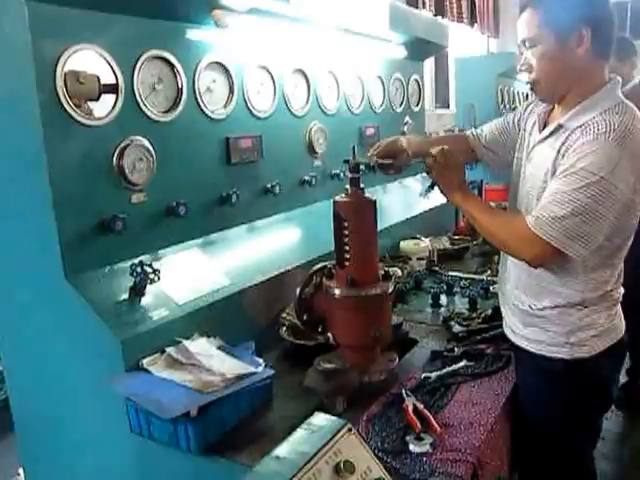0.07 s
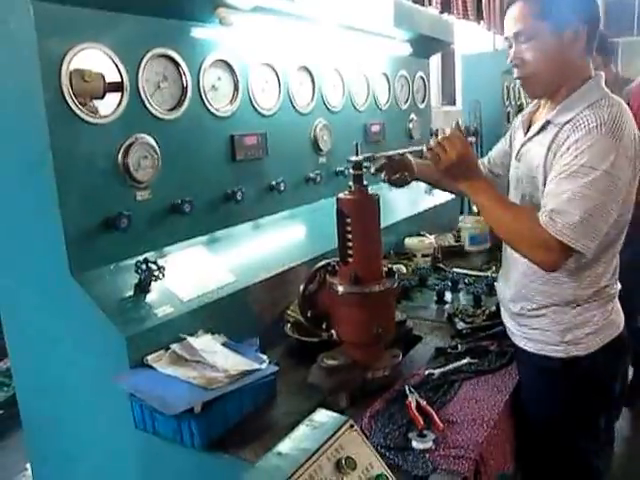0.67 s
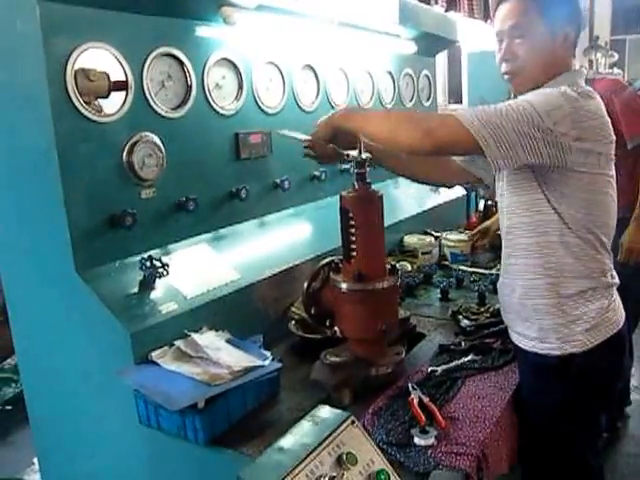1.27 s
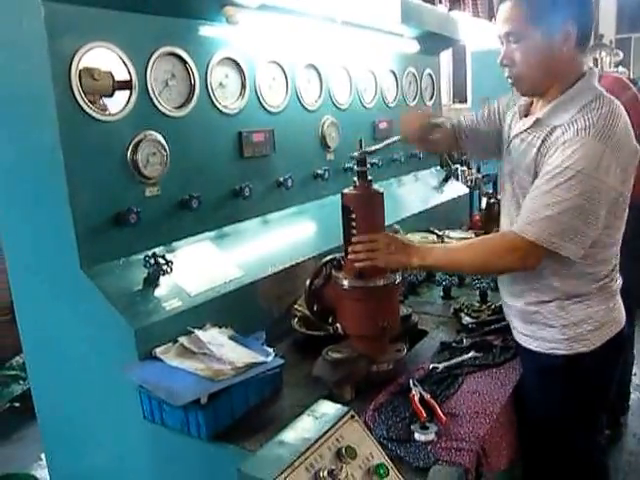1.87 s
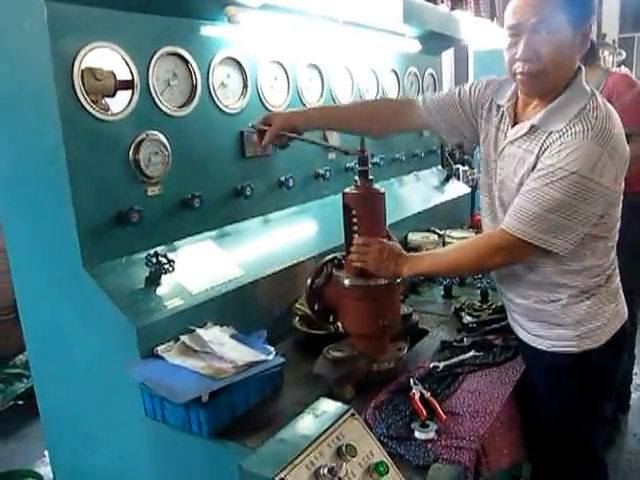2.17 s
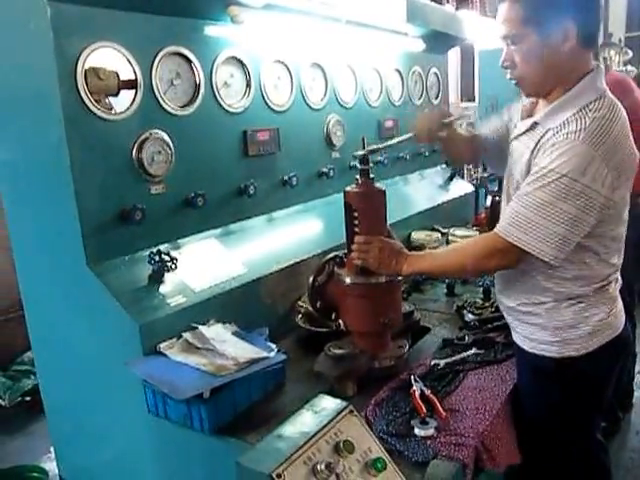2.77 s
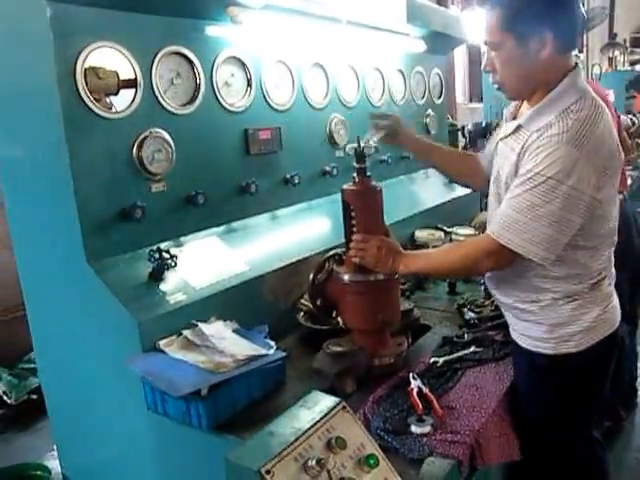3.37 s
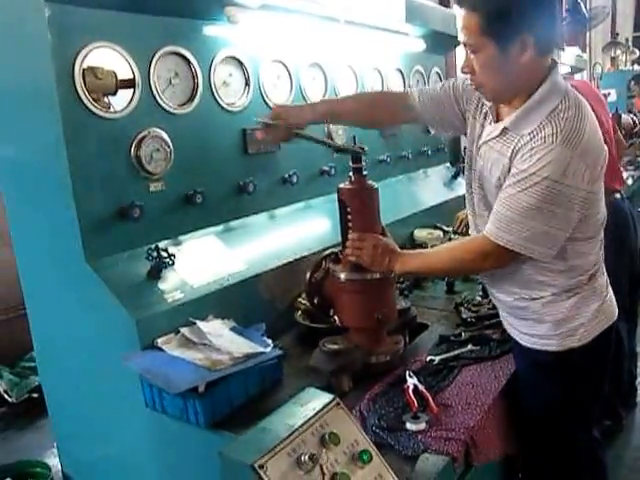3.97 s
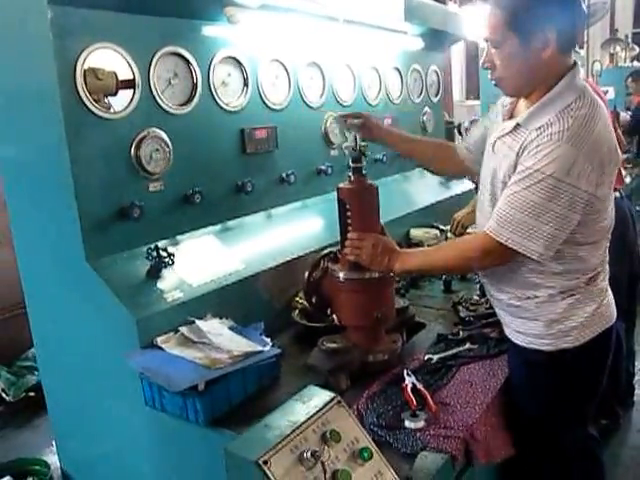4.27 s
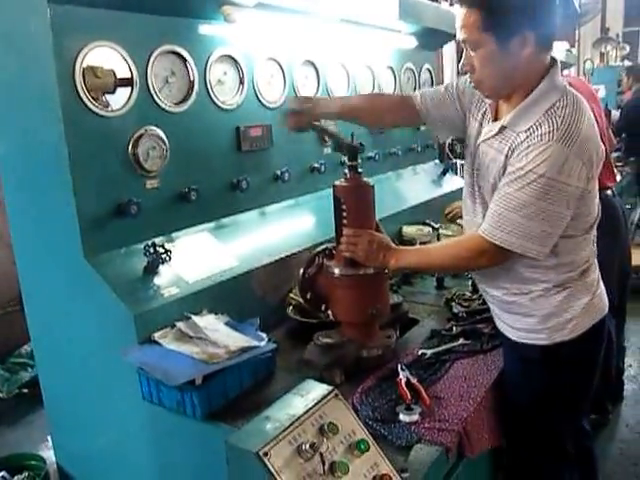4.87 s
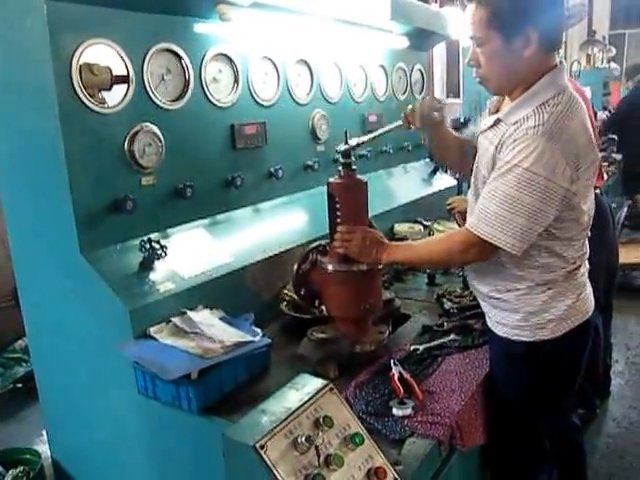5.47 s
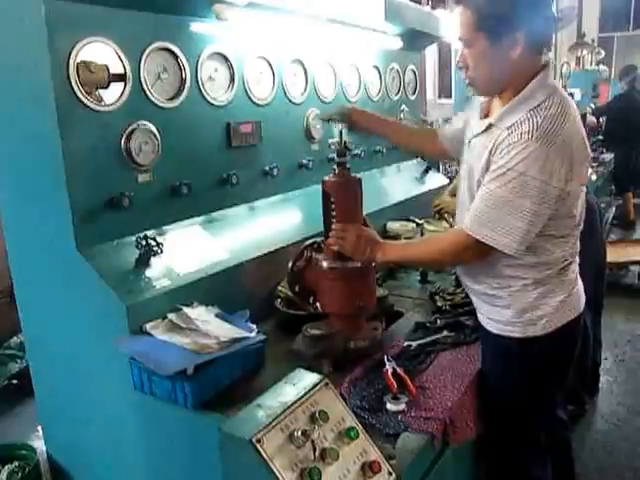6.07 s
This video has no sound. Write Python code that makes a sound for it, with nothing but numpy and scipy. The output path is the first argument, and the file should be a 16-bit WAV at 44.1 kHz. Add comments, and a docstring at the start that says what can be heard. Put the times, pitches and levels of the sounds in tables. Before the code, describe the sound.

Loud machinery rumbles throughout in a workshop, with motor hums and whines that swell and fade and air hissing in uneven surges. A thin, higher jet of air eases off at around 2 seconds. At the very start a steel wrench rings briefly as it rubs, and irregular metal knocks and short scrapes follow, busiest in the first second. At about 1.5 seconds a heavy part lands on the bench with a dull thump. A second machine then takes up load, building from 2 seconds into a broad, resonant drone that lasts to the end. Faint rough squeals come and go between 3.2 and 5.4 seconds. A soft puff of air vents at 4 seconds. Near 4.5 seconds steel scrapes and rings, the ring dying away slowly. Scattered knocks continue under the din until the end at about 6 seconds.

```python
"""Machine shop, valve test bench

Motors rumble and hum; air hisses in uneven surges. A heavy part lands with a dull thump.
A second machine then takes up load: friction drives its frame into a broad, resonant drone.
Steel parts clatter and scrape under the din; now and then rubbed metal rings."""
import sys
import numpy as np
from scipy import signal
from scipy.fft import rfft, irfft
from scipy.io import wavfile
from scipy.ndimage import uniform_filter1d

SR = 44100
rng = np.random.default_rng(int(sys.argv[2]) if len(sys.argv) > 2 else 0)


def transcribe(u):
    """Save the signal u as a 16-bit wav file named by the first command-line argument.

    u: samples, shape (n,) or (channels, n), limited to [-1, 1]; the rate is SR.
    q: integer samples, one column per channel.
    """
    v = np.clip(np.atleast_2d(u).T, -1, 1)
    q = np.round(v * 32767).astype(np.int16)
    wavfile.write(sys.argv[1], SR, q)


N = 269892
TIME_S = np.arange(N) / SR
BINS_HZ = np.maximum(np.arange(N // 2 + 1) * SR / N, 1)

# shop rumble: f/Hz, level/dB
RUMBLE_SPECTRUM = [(20, -46), (45, -53), (95, -32), (135, -20.5), (180, -10.5), (250, -7.5), (340, -2),
                   (450, -1.5), (560, -0.5), (700, -4.5), (800, -4.5), (930, -2.5), (1240, -15),
                   (1500, -16), (2200, -71)]
# rumble bass: t/s, lift/dB
BASS_LIFT = [(0, 2), (.8, 2.5), (2.2, 3), (3.6, -2.5), (4.4, -.5), (6.1, 0.5)]
# hollow benches and housings: f/Hz, width/Hz, lift/dB
HOUSING_MODES = [(88, 12, 2.5), (120.5, 3.8, 8), (291, 16, 3.5), (385, 44, 4), (462, 71, 4), (650, 15, 2)]

# broad hiss, thin jet, vented air: f/Hz, level/dB
HISS_SPECTRUM = [(700, -39.5), (1100, -2), (1400, -2), (1750, 0), (2350, -2.5), (3150, -6), (3460, -5.5),
                 (4300, -12), (5950, -26), (7000, -51.5), (9000, -80)]
JET_SPECTRUM = [(2800, -18), (3600, -2), (4350, 0), (4800, -5), (5400, -11), (6100, -18.5), (6900, -34.5)]
PUFF_SPECTRUM = [(3000, -19), (4100, 4.5), (5200, 4), (6100, -8), (6900, -27.5), (9000, -68)]
# air flow surges: start/s, end/s, lift/dB
FLOW_SURGES = [(-.1, .48, 3.5), (.53, 1.1, 1.5), (.61, .77, 2), (.86, .92, 1), (1.06, 1.56, 4.5),
               (1.75, 1.87, 3.5), (2.8, 3.02, 0), (3.27, 3.43, 0.5), (3.6, 3.83, 1.5), (4.1, 4.44, 4.5),
               (4.54, 4.82, 1.5), (5.25, 5.88, 1.5)]
# vent puffs: t/s, level/dB, t60/s, rise/s
VENT_PUFFS = [(4.015, -34, 1.6, 0.003), (4.14, -41, 1.4, 0.027)]

# motor whine swells: start/s, end/s, lift/dB
WHINE_LIFTS = [(.28, .5, 12), (.5, 1.2, 8), (3.75, 4.3, 7.5), (4.85, 5.32, 9), (5.48, 5.85, 7.5)]
# loaded machine's note: t/s, level/dB
NOTE_ENVELOPE = [(1.7, -46), (2.0, -25), (2.65, -26.5), (3.05, -19.5), (3.55, -32), (4.0, -25),
                 (4.35, -31.5), (4.8, -20.5), (5.05, -30.5), (5.55, -30), (5.85, -33)]
# passing hums: start/s, end/s, f/Hz, wander/Hz, level/dB
MOTOR_HUMS = [(0, 1.405, 445, 1.24, -26.5), (0.402, 1.04, 910, 3.5, -28.5), (1.615, 2.303, 393.6, 15, -26),
              (2.395, 3.895, 847.6, 24, -27.5), (3.7, 6.6, 821, 2.04, -35.5)]

# steel modes; the wrench rubbed at another spot later shares its 2665 Hz mode: f/Hz, wander/Hz, level/dB
WRENCH_MODES = [(2665, 5, 3.5), (3415, 22, -5), (3854, 8, -2), (4027, 12, -5), (4165, 16, -1),
                (4218, 11, 1)]
SCREW_MODES = [(3343, 14, -5), (3553, 9, 0)]
WRENCH_OTHER_SPOT_MODES = [(1730, 30, 2), (1900, 26, 1), (2105, 20, 4), (2666, 7, .5), (5023, 24, -9), (5109, 13, -3.5),
                           (5290, 26, -10), (5332, 26, -9), (5696, 20, -10), (5738, 18, -11), (5911, 13, -10),
                           (5990, 26, -17)]
# main steel knocks: t/s, level/dB, treble/dB
LOUD_KNOCKS = [(0.2144, -4.5, 2.5), (0.388, -9, 4), (0.4647, -3.5, 0), (0.6386, -6.5, 0), (0.729, -9.5, 3),
               (0.875, -6.5, 1), (1.319, -16, 3), (1.4124, -9, -5), (1.518, -4, 0.5), (1.792, -8, -3),
               (1.988, -7.5, -10), (2.383, -6, -6), (2.583, -6, -4), (3.054, -18.5, 3), (3.304, -7, -2),
               (3.4, -5, -7), (3.48, -7, -9), (3.775, -5.5, -5), (4.808, -3, -5), (4.847, -8, -11),
               (4.95, -6, -8), (5.239, -8.5, 2), (5.48, -9, 2), (5.6475, -11, -3), (5.862, -9, 0)]
# sliding steel: start/s, end/s, level/dB
SCRAPE_STROKES = [(0.616, 0.743, -28), (1.11, 1.18, -27), (2.72, 2.91, -28.5), (4.203, 4.424, -30),
                  (4.55, 4.732, -23)]
# steel contact noise: f/Hz, level/dB
KNOCK_SPECTRUM = [(500, -30), (1200, 12.5), (2500, 4), (4000, 0.5), (6000, -16.5), (7000, -40)]
SCRAPE_SPECTRUM = [(700, -28), (1200, 4), (1900, -3), (2700, -10.5), (3800, -7), (4800, -22.5),
                   (6000, -28.5), (7000, -57.5)]

# heavy part's contacts: t/s, level/dB
PART_BOUNCES = [(1.553, -3), (1.5615, -.5), (1.5745, -1.5), (1.589, -2)]
# struck bench: f/Hz, level/dB, t60/s
BENCH_MODES = [(245, -15, .09), (306, -7.5, .12), (398, -11, .09), (590, -10, .04), (655, -4, .045),
               (750, -9, .03), (822, -6, .04), (885, -6, .05), (928, -11, .04)]
# thump's tail in the shop: f/Hz, level/dB
TAIL_SPECTRUM = [(40, -29), (150, -21.5), (310, 6), (520, -10), (680, 4), (930, 1), (1080, -20),
                 (2000, -44), (6000, -80)]

# second machine's load: t/s, level/dB
LOAD_ENVELOPE = [(0, -43), (1.5, -27.5), (2.0, -22), (2.8, -20), (4.1, -19), (4.75, -22.5), (5.4, -18),
                 (6.12, -19)]
# its frame resonances: f/Hz, width/Hz, level/dB
FRAME_MODES = [(426, 75, -2), (693, 77, -5.5), (810, 130, -2.5), (1110, 390, -12), (1634, 100, -9),
               (3050, 200, -14.5), (3285, 240, -15.5), (5130, 290, -32.5)]
# its rough notes: start/s, end/s, f/Hz, level/dB
FRICTION_NOTES = [(3.2, 3.5, 3276, -37), (3.37, 3.947, 1664, -32.5), (3.5, 3.82, 3170, -35.5),
                  (4.11, 4.21, 3190, -30), (5.003, 5.396, 1613, -34)]


def from_db(db):
    """Decibels to gain."""
    return 10 ** (np.asarray(db) / 20)


def unit_rms(x):
    """Scale to rms 1."""
    return x / np.sqrt(np.mean(x ** 2) + 1e-20)


def curve(points):
    """Breakpoints to a value per sample."""
    return np.interp(TIME_S, *np.transpose(points))


def colour(spectrum):
    """Breakpoints to a gain per bin."""
    hz, db = np.transpose(spectrum)
    return from_db(np.interp(np.log(BINS_HZ), np.log(hz), db))


def bell(hz, half_width_hz):
    """Resonance gain per bin, peak 1."""
    return 1 / (1 + ((BINS_HZ - hz) / half_width_hz) ** 2)


def filtered(x, gain):
    """Apply a gain per bin."""
    return irfft(rfft(x) * gain, N)


def noise(gain):
    """Shaped noise, rms 1."""
    return unit_rms(filtered(rng.standard_normal(N), gain))


def drift(rate_hz):
    """Slow random motion, rms 1."""
    return noise(bell(0, rate_hz))


def ramp(start_s, length_s, top=1):
    """Linear rise, 1 per length_s, capped at top."""
    return np.clip((TIME_S - start_s) / length_s, 0, top)


def gate(start_s, end_s, edge_s):
    """Window with linear fades centred on its ends."""
    return np.clip(np.minimum(TIME_S - start_s, end_s - TIME_S) / edge_s + .5, 0, 1)


def swells_db(events, edge_s):
    """Summed lifts that rise, hold and fall."""
    return sum(db * gate(start_s, end_s, edge_s) for start_s, end_s, db in events)


def decay(start_s, t60_s, rise_s):
    """Blow envelope: quick rise, exponential fall."""
    age_s = np.maximum(TIME_S - start_s, 0)
    return (1 - np.exp(-age_s / rise_s)) * from_db(-60 * ramp(start_s, t60_s, top=3))


def tone(hz, wander_hz, level_db, waver_db, rate_hz):
    """Sine wavering in pitch and level."""
    phase = 2 * np.pi * np.cumsum(hz + wander_hz * drift(rate_hz)) / SR
    return np.sqrt(2) * np.sin(phase) * from_db(level_db + waver_db * drift(rate_hz))


def rumble(level_db=-16.5, sag_db_per_s=.06, flutter_db=.5, bass_hz=250):
    """Many machines blend into a roar coloured by the housings; its bass swells, then eases."""
    housing_db = sum(db * bell(hz, width_hz / 2) for hz, width_hz, db in HOUSING_MODES)
    roar = noise(colour(RUMBLE_SPECTRUM) * from_db(housing_db))
    bass = filtered(roar, 1 / (1 + (BINS_HZ / bass_hz) ** 8))
    envelope = from_db(level_db - sag_db_per_s * TIME_S + flutter_db * drift(rate_hz=16))
    return envelope * (roar + (from_db(curve(BASS_LIFT)) - 1) * bass)


def air(hiss_db=-26.5, creep_db_per_s=.2066, jet_db=-37.5, jet_drop_db=9, jet_follow=.61, sputter_db=1.1):
    """Hiss and a slowly closing jet surge with the flow; both sputter along with the vent puffs."""
    surge_db = swells_db(FLOW_SURGES, edge_s=.13)
    hiss = from_db(hiss_db + creep_db_per_s * TIME_S + surge_db) * noise(colour(HISS_SPECTRUM))
    closing_db = jet_drop_db * ramp(start_s=1.36, length_s=1)
    jet = from_db(jet_db - closing_db + jet_follow * surge_db) * noise(colour(JET_SPECTRUM))
    venting = sum(from_db(db) * decay(t_s, t60_s, rise_s) for t_s, db, t60_s, rise_s in VENT_PUFFS)
    puffs = venting * noise(colour(PUFF_SPECTRUM))
    return (hiss + jet + puffs) * from_db(sputter_db * drift(rate_hz=35))


def motors(whine_hz=559.2, whine_db=-32, note_hz=425.4, wander_hz=.83):
    """Motor whine and the loaded machine's note swell at near-steady pitch; hums come and go."""
    waver = dict(waver_db=1.15, rate_hz=14)
    whine = tone(whine_hz, wander_hz, whine_db + swells_db(WHINE_LIFTS, edge_s=.11), **waver)
    note = tone(note_hz, wander_hz, curve(NOTE_ENVELOPE), **waver)
    hums = sum(gate(start_s, end_s, edge_s=.079) * tone(hz, hum_wander_hz, db, **waver)
               for start_s, end_s, hz, hum_wander_hz, db in MOTOR_HUMS)
    return whine + note + hums


def rubbed_steel(modes, start_s, end_s, level_db, t60_s, drop_db=0, rise_s=.0063, release_s=.053):
    """Rubbing feeds narrow modes: a held, rough ring that dies away on release."""
    fall_db = drop_db * ramp(end_s, release_s) + 60 * ramp(end_s, t60_s, top=3)
    ring = sum(tone(hz, wander_hz, db, waver_db=3, rate_hz=55) for hz, wander_hz, db in modes)
    return ramp(start_s, rise_s) * from_db(level_db - fall_db) * unit_rms(ring)


def clatter(gain_db=-10, t60_s=.088, treble_hz=3600, small_per_s=3.6, small_db=-22.5, spread_db=1.5):
    """Steel knocks on steel, with lesser knocks at random. Hard contacts carry more treble."""
    steel = noise(colour(KNOCK_SPECTRUM))
    treble = filtered(steel, 1 / (1 + (treble_hz / BINS_HZ) ** 8))
    gap_draws, level_draws = rng.random((60, 2)).T
    times_s = np.cumsum(-np.log(1 - gap_draws)) / small_per_s
    levels_db = small_db + spread_db * (1 - 2 * level_draws)
    small = [(t_s, db, 0) for t_s, db in zip(times_s, levels_db) if t_s < N / SR]
    knocks = np.zeros(N)
    for t_s, db, treble_db in list(LOUD_KNOCKS) + small:
        contact = steel + (from_db(treble_db) - 1) * treble
        knocks += from_db(db + gain_db) * decay(t_s, t60_s, rise_s=.0006) * contact
    return knocks


def scraping(grain_db=3, grain_hz=90):
    """Sliding steel sticks and slips: a coarse-grained rasp."""
    strokes = sum(from_db(db) * gate(start_s, end_s, edge_s=.022) for start_s, end_s, db in SCRAPE_STROKES)
    rasp = noise(colour(SCRAPE_SPECTRUM)) * from_db(grain_db * drift(grain_hz))
    return strokes * unit_rms(rasp)


def thump(contact_s=.0008, contact_hz=1200, radiate_hz=260, tail_db=-16):
    """A heavy part bounces; soft contacts ring the bench, which radiates little bass. Dull tail."""
    bench = sum(from_db(db + mode_db) * decay(t_s, t60_s, contact_s)
                * np.sin(2 * np.pi * hz * (TIME_S - t_s))
                for t_s, db in PART_BOUNCES for hz, mode_db, t60_s in BENCH_MODES)
    band = signal.butter(2, [radiate_hz, contact_hz], "band", fs=SR, output="sos")
    landing_s = PART_BOUNCES[0][0]
    tail = from_db(tail_db) * decay(landing_s, t60_s=.49, rise_s=.0024) * noise(colour(TAIL_SPECTRUM))
    return signal.sosfilt(band, bench) + tail


def loaded_machine(judder_db=2, judder_hz=32, radiate_hz=260):
    """Friction under load shakes a resonant frame, too small to radiate deep bass."""
    frame_power = sum((from_db(db) * bell(hz, width_hz / 1.7)) ** 2 for hz, width_hz, db in FRAME_MODES)
    radiation = 1 / (1 + (radiate_hz / BINS_HZ) ** 4)
    envelope = from_db(curve(LOAD_ENVELOPE) + judder_db * drift(judder_hz))
    return envelope * noise(np.sqrt(frame_power) * radiation)


def singing(wander_hz=18):
    """Friction locks onto a frame resonance and sings a rough note."""
    return sum(gate(start_s, end_s, edge_s=.072) * tone(hz, wander_hz, db, waver_db=2.5, rate_hz=60)
               for start_s, end_s, hz, db in FRICTION_NOTES)


def limiter(x, ceiling_db=-11, window_s=.01, attack_hz=25, release_db_per_s=70):
    """Gain drops on loud moments, then recovers."""
    power = uniform_filter1d(x ** 2, int(window_s * SR))
    over_db = np.maximum(10 * np.log10(np.maximum(power, 1e-12)) - ceiling_db, 0)
    recovery_db = release_db_per_s * TIME_S
    held_db = np.maximum.accumulate(over_db + recovery_db, axis=-1) - recovery_db
    smoothing = signal.butter(1, attack_hz, fs=SR, output="sos")
    return x * from_db(-signal.sosfilt(smoothing, held_db))


def scene():
    """All sources, mono."""
    steel = clatter() + scraping()
    steel += rubbed_steel(WRENCH_MODES, start_s=0, end_s=.26, level_db=-30, t60_s=.3)
    steel += rubbed_steel(SCREW_MODES, start_s=.88, end_s=1.25, level_db=-38.5, t60_s=.5)
    steel += rubbed_steel(WRENCH_OTHER_SPOT_MODES, start_s=4.535, end_s=4.81, level_db=-31.5, t60_s=2.6, drop_db=6)
    return (rumble() + air() + loaded_machine() + singing() + motors() + thump() + steel)[None]


def record(dry):
    """Limiter, soft clip, steep low-pass."""
    clip_level, cutoff_hz = 1.5, 7650
    rounded = clip_level * np.tanh(limiter(dry) / clip_level)
    return signal.sosfilt(signal.cheby2(16, 60, cutoff_hz, fs=SR, output="sos"), rounded)


dry = scene()
out = record(dry)
transcribe(out)
```